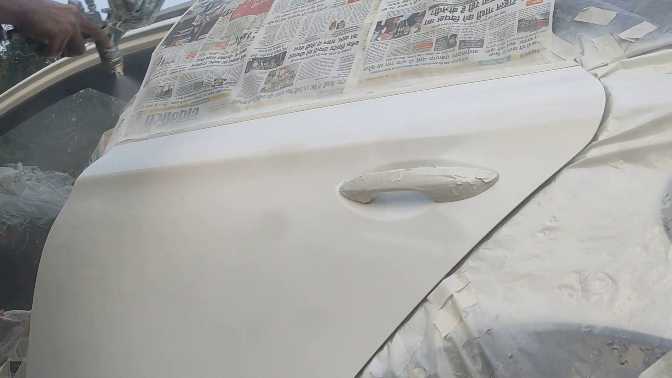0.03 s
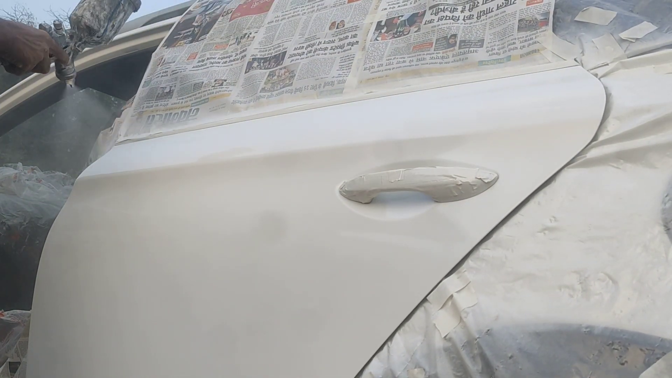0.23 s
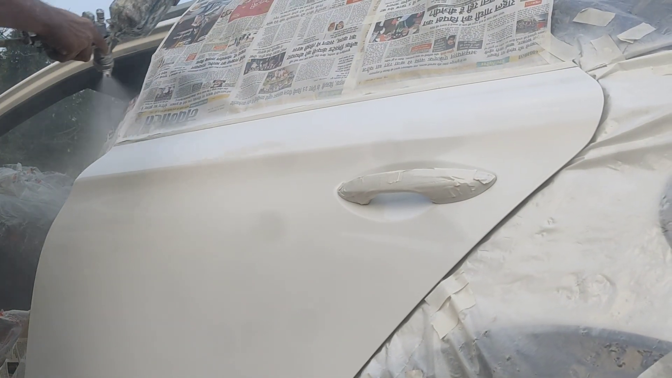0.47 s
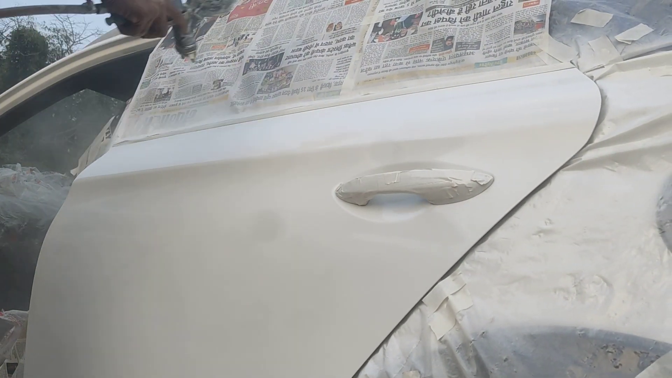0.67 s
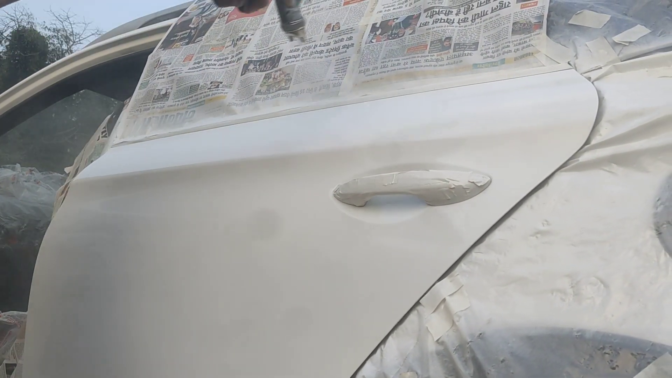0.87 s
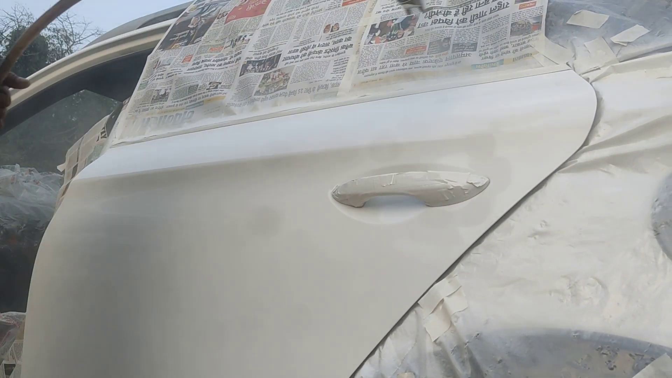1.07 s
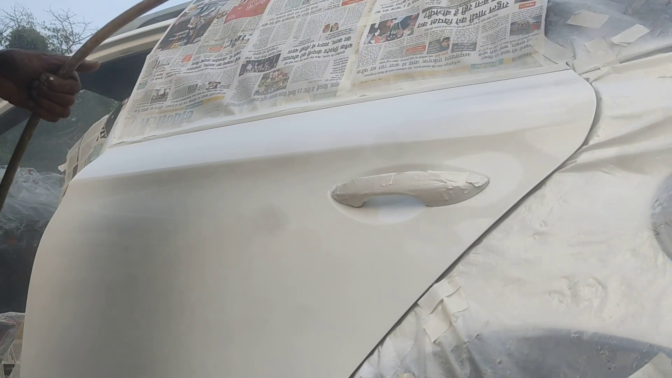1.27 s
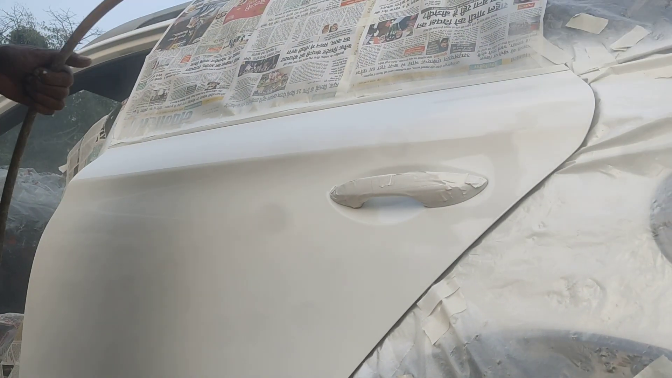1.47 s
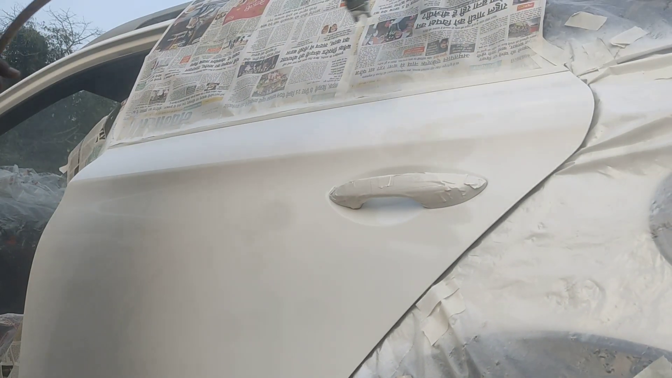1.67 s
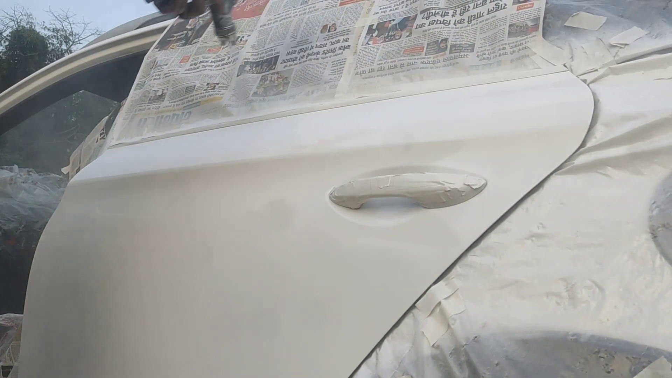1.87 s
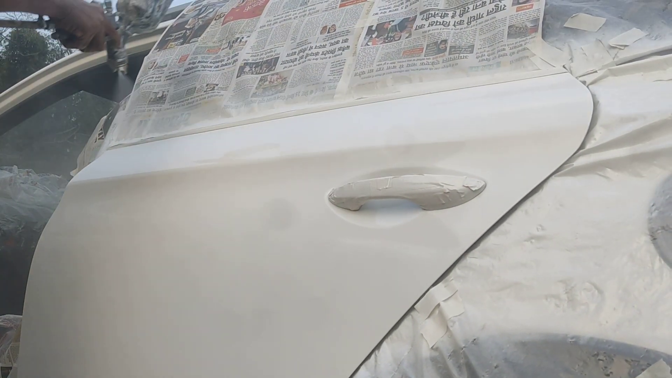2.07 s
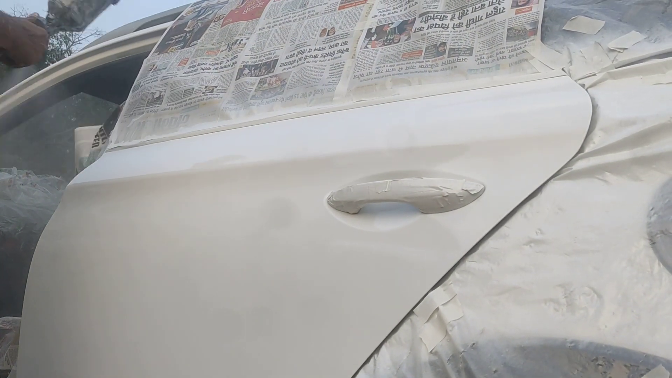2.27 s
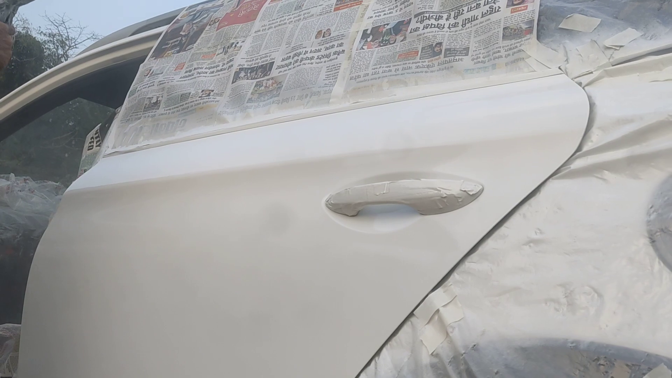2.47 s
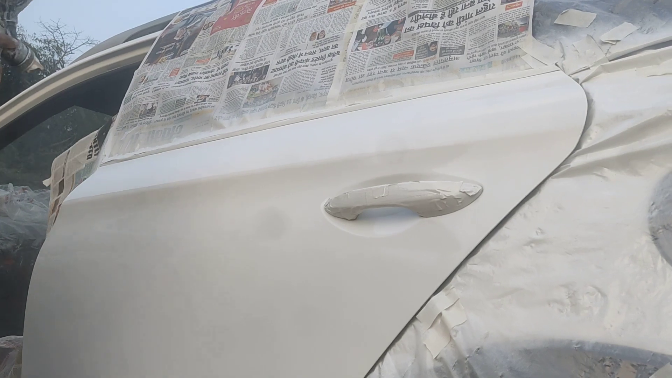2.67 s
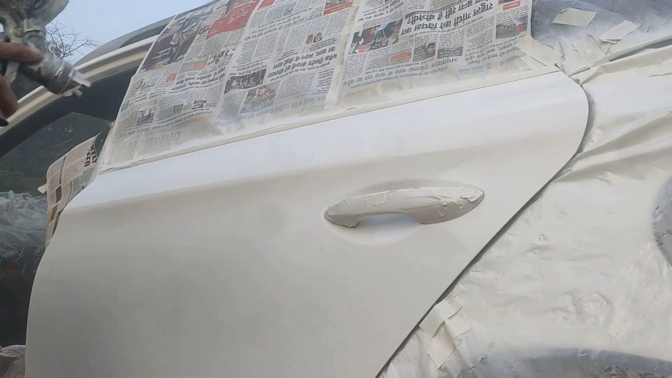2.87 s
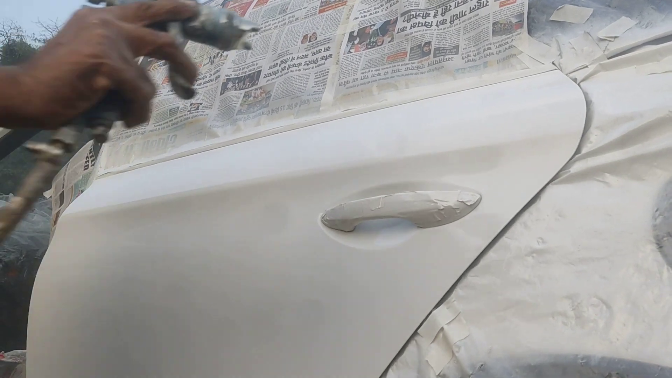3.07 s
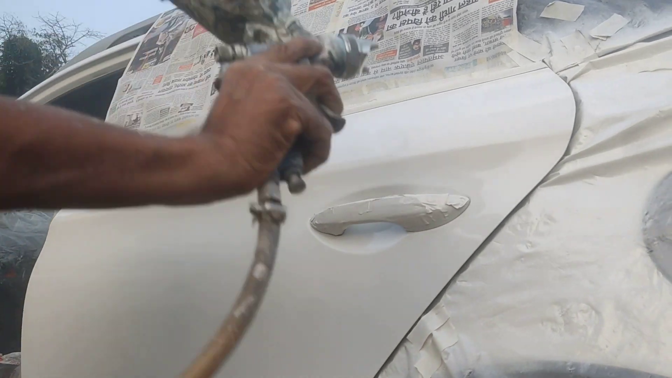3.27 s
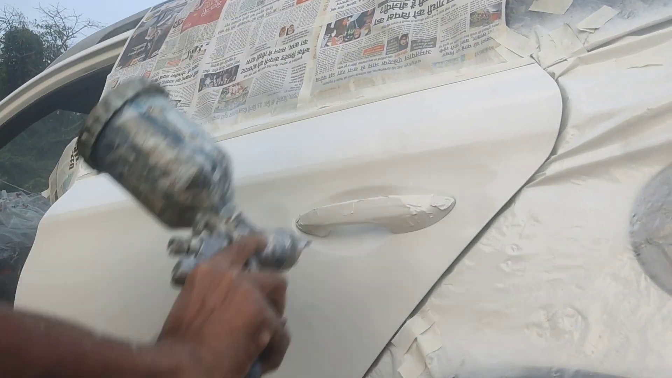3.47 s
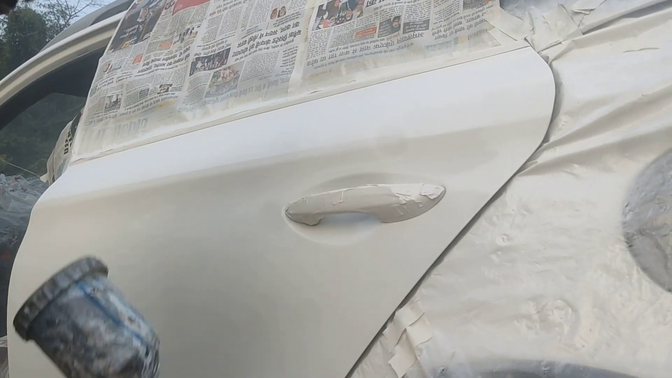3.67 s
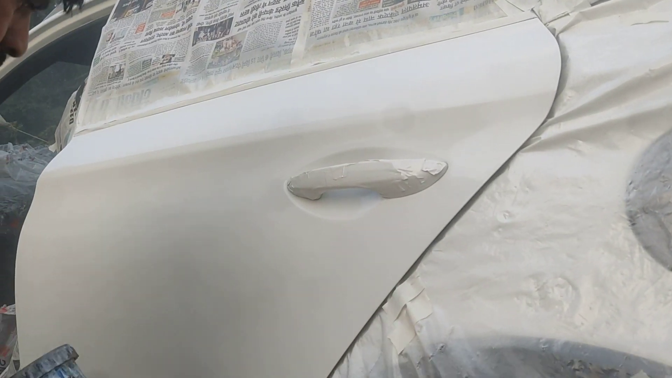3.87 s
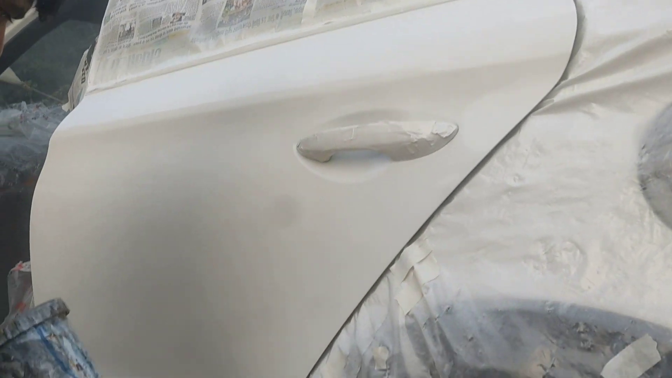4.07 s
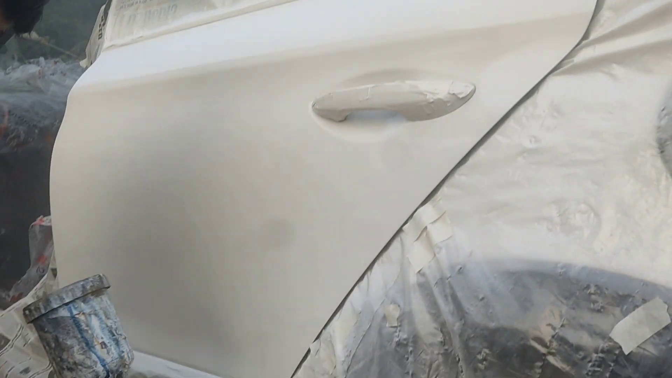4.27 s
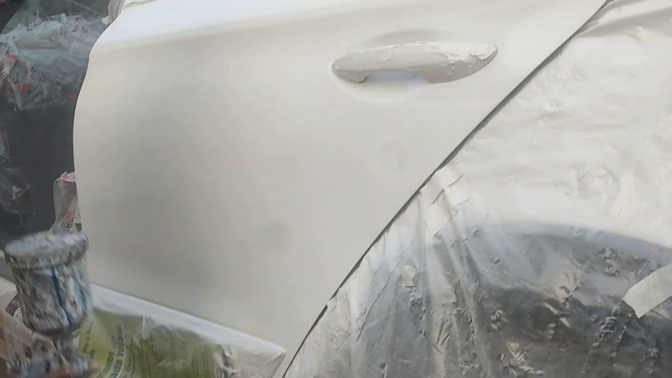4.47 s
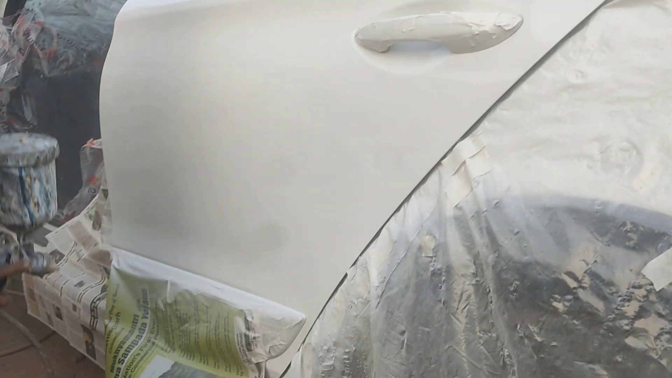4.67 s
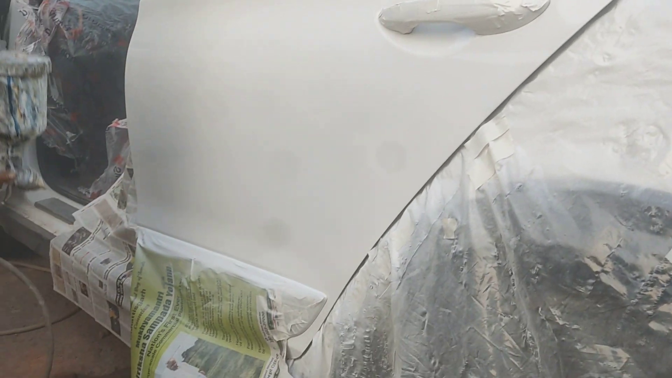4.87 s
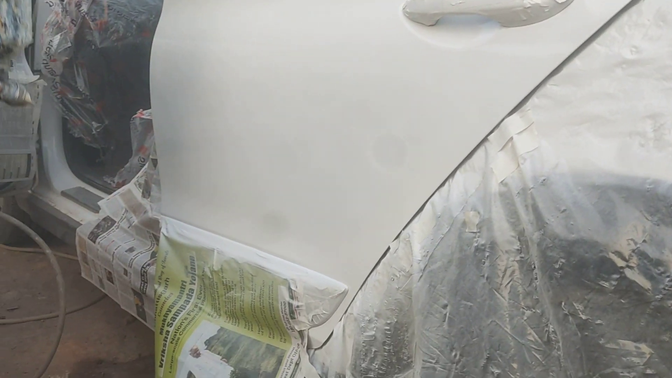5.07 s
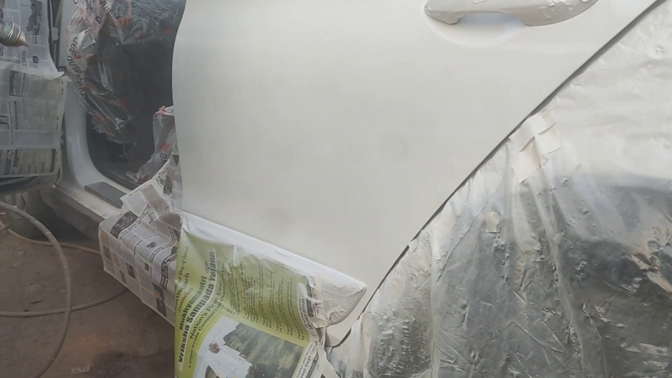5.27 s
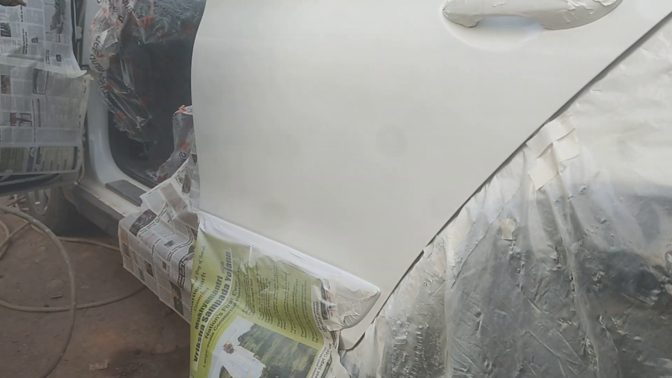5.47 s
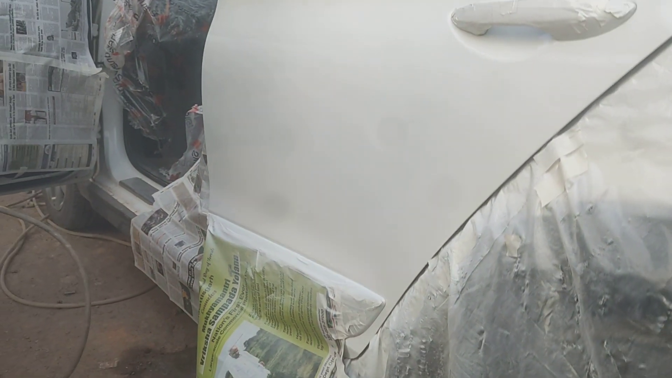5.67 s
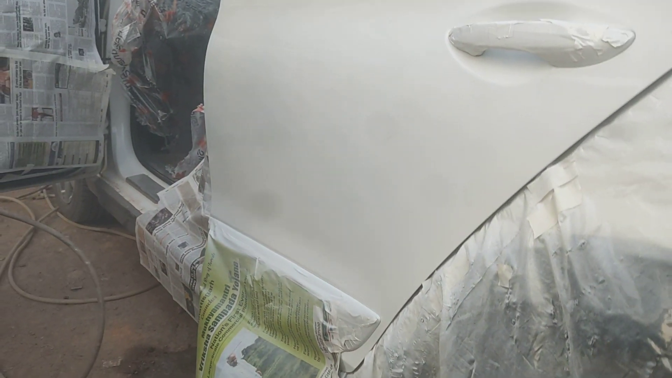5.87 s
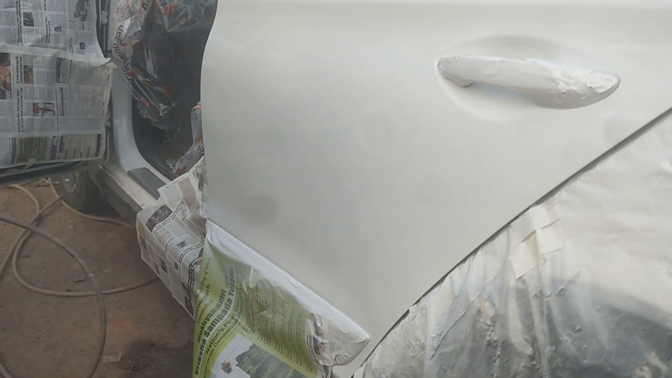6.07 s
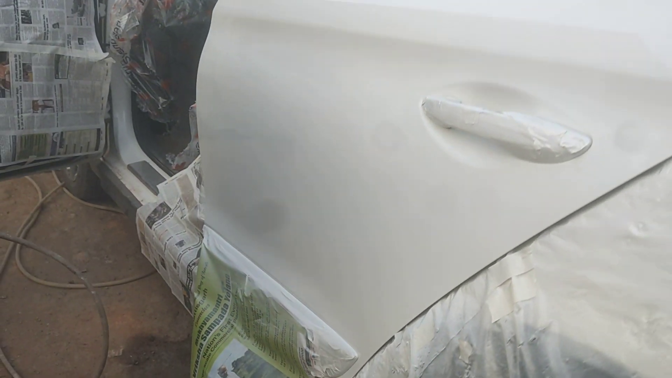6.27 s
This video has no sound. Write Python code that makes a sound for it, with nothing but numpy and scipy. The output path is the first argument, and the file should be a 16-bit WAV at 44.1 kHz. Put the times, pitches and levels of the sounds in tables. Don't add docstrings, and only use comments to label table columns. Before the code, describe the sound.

Outdoors beside a car door, an air spray gun hisses steadily and brightly for a little over two seconds. The trigger lets go and only a thin leak remains, until the nozzle swings past with a quick falling whoosh. A second, stronger spray follows, then weak uneven puffs fade away. A compressor hums steadily underneath. The sound sits almost wholly in the right channel; the left is muffled and nearly silent.

```python
import sys
import numpy as np
from scipy import signal
from scipy.io import wavfile
from scipy.ndimage import uniform_filter1d

SR = 44100
rng = np.random.default_rng(int(sys.argv[2]) if len(sys.argv) > 2 else 0)


def transcribe(signal):
    frames = np.atleast_2d(signal).T
    limited = np.clip(frames, -1, 1)
    pcm = np.round(limited * 32767).astype(np.int16)
    wavfile.write(sys.argv[1], SR, pcm)


def amplitude_ratio(level_db):
    exponent = np.asarray(level_db, float) / 20
    return 10 ** exponent


N = 279153
OPEN_DB = 5.5


def evened(x):
    return x / np.sqrt(np.mean(x ** 2) + 1e-20)


def smooth_random(size, passes):
    drift = rng.standard_normal(N)
    for _ in range(passes):
        drift = uniform_filter1d(drift, size=size)
    return evened(drift)


def read(points, hz):
    f, value = np.transpose(points)
    return np.interp(np.log(hz + 1), np.log(f + 1), value)


def curve(rows, t):
    s, *columns = np.transpose(rows)
    return [np.interp(t, s, c) for c in columns]


def grid(size):
    return np.arange(4 * N // size + 5) * size / 4 / SR, np.fft.rfftfreq(size, 1 / SR)[:, None]


def noise(field_db, size, patchy_db, flicker_db):
    t, hz = grid(size)
    a, b, patches = rng.standard_normal((len(t), len(hz), 3)).T
    patches = uniform_filter1d(patches, size=9, axis=0)
    patches = evened(uniform_filter1d(patches, size=17, axis=1))
    flicker = evened(uniform_filter1d(rng.standard_normal(len(t)), size=4))
    z = (a + 1j * b) * amplitude_ratio(field_db + patchy_db * patches + flicker_db * flicker)
    return evened(signal.istft(z, nperseg=size, noverlap=3 * size // 4)[1][:N])


# start_s, pitch_hz
ECHO_NOTCH = [(0, 4900), (.3, 4120), (.6, 4460), (.9, 4200), (1.5, 3960), (1.85, 4660), (2.15, 4350),
              (2.5, 3740), (3, 4960), (3.55, 4370), (4.3, 4270), (4.7, 4300), (4.95, 3840), (5.3, 4100),
              (6.33, 5200)]


def reflection_db(size):
    t, hz = grid(size)
    ratio = hz / curve(ECHO_NOTCH, t)[0]
    width = .08
    first_dip = np.exp(-((ratio - 1) / width) ** 2)
    third_dip = np.exp(-((ratio / 3 - 1) / width) ** 2)
    return -2.8 * first_dip - 1.5 * third_dip


# start_s, open_trigger_level_db, facing_microphone (0-1), striking_panel (0-1)
SPRAY_PASSES = [
    [(0, -28, 0.25, 0.57), (.3, -28, 0.4, 0.54), (.55, -25.5, 0.23, 0.59), (.76, -25, 0.5, 0.62),
     (.97, -27.5, 0.82, 0.73), (1.36, -28.5, 0.73, 0.68), (1.6, -27, 0.77, 0.74), (1.9, -26, 0.26, 0.65),
     (2.26, -27.5, 0.38, .2)],
    [(3.07, -23, 0.84, 0.16), (3.28, -22, 1, 0.12), (3.42, -22.5, 0.62, 0.44), (3.52, -24.5, 0.49, 0.85),
     (3.76, -24, 0.28, 0.67), (3.84, -23.5, 0.4, 0.18), (4.1, -20.5, 0.24, 0.15), (4.2, -22, 0.32, 0.18),
     (4.33, -23.5, 0.27, 0.3)],
]
LEAKING_RESTS = [
    [(2.3, -25.5, 0.39, 0.035), (2.47, -28.5, 0.65, .1), (2.61, -22, .2, 0.12), (2.68, -16.5, 0, 0),
     (2.76, -13, 0.25, 0), (2.88, -17, 0.23, 0.73), (2.98, -24.5, .3, 0.42)],
    [(4.4, -23.5, 0.23, 1), (4.55, -23, .3, 0.76), (4.81, -26.5, 0.57, 0.84), (5.1, -27.5, 0.35, 0.85),
     (5.3, -32, 0.32, 0.81), (5.75, -33.5, 0.18, 0.89), (6.08, -38, 0.098, 1), (6.33, -33.5, 0.06, .6)],
]
# pulled_s, let_go_s
TRIGGER_PULLS = [
    (-1, 2.262),
    (3.037, 4.337),
]
# peak_s, level_db, rise_s, fall_s
HOSE_SURGES = [(.05, 2.5, .04, .08), (.83, 0, 0.06, .1), (1.4, 1.5, 0.023, 0.075), (2.52, 5, .03, 0.067),
               (3.356, 4, 0.039, 0.071), (4.135, 1.5, 0.082, 0.041), (4.284, 2.5, .04, 0.049),
               (4.59, 7, 0.046, 0.063), (4.675, 9.5, 0.026, 0.048), (4.77, 8.5, .025, 0.034),
               (4.944, 10, 0.088, 0.071), (5.414, 6.5, 0.0087, 0.08), (5.52, 5, 0.037, 0.074),
               (5.87, 7.5, 0.11, 0.11), (6.2, 6.5, .1, 0.14)]


def aim(t):
    hand = SPRAY_PASSES[0] + LEAKING_RESTS[0] + SPRAY_PASSES[1] + LEAKING_RESTS[1]
    level_db, facing, striking = curve(hand, t)
    opens_s, shuts_s = .026, .023
    seep_db = -17.5
    pulled = 0
    for pulled_s, let_go_s in TRIGGER_PULLS:
        opening = (t - pulled_s) / opens_s
        shutting = 1 - (t - let_go_s) / shuts_s
        pulled = pulled + np.clip(np.minimum(opening, shutting), 0, 1)
    surge_db = 0
    for s, db, rise, fall in HOSE_SURGES:
        surge_db = surge_db + np.interp(t, [s - rise, s, s + fall], [0, db, 0])
    return level_db + seep_db * (1 - pulled) + surge_db, facing, striking, 1 - pulled, -surge_db


def layer_db(law, controls):
    return law[0] + np.dot(law[1:], controls)


# pitch_hz, level_db (per Hz)
OPEN_HISS = [(180, -63), (300, -23.5), (544, -29), (663, -24.5), (1110, -18.5), (1310, -18.5), (1700, -14),
             (2620, -16.5), (4300, -16), (6500, 2.5), (8050, -11), (9190, -14.5), (10700, -24),
             (12400, -21.5), (15600, -26)]
LAYER_BORDERS_HZ = [3200, 5200, 8200]
# aimed_away_db, facing_db, striking_db, released_db, surge_missed (share)
SPLASH_LAW = (-22, -0.5, 13, -1.5, .5)
SHOULDER_LAW = (-15.5, 6, 2, 3, 0.37)
FIZZ_LAW = (-11, 7, -2, -3.5, 0.3)
# start_s, pitch_hz, level_db (over the shoulder)
SWINGING_WHOOSH = [
    (2.72, 5430, -7),
    (2.8, 4550, 3),
    (2.91, 4230, 14.5),
    (2.97, 3650, 7),
    (3.02, 3060, 4),
    (3.04, 3100, -1.5),
]


def spray(controls):
    t, hz = grid(size=512)
    away_hz, facing_hz, centre_hz = 6950, 6230, 6500
    slide = (away_hz + (facing_hz - away_hz) * aim(t)[1]) / centre_hz
    above = [1 / (1 + (border / (hz + 1)) ** 24) for border in LAYER_BORDERS_HZ]
    shares = [1 - above[0], above[0] - above[1], above[1] - above[2], above[2]]
    share_db = [10 * np.log10(abs(s) + 1e-9) for s in shares]
    whoosh_hz, whoosh_db = curve(SWINGING_WHOOSH, t)
    aimed_db = reflection_db(size=512) + whoosh_db * np.exp(-((hz / whoosh_hz - 1) / 0.13) ** 2)
    hiss_db = read(OPEN_HISS, hz)
    splash = noise(hiss_db + share_db[0], size=512, patchy_db=1.5, flicker_db=0.06)
    shoulder = noise(hiss_db + aimed_db + share_db[1], size=512, patchy_db=0.2, flicker_db=0.86)
    jet = noise(read(OPEN_HISS, hz / slide) + share_db[2], size=512, patchy_db=0.55, flicker_db=0.5)
    fizz = noise(hiss_db + aimed_db + share_db[3], size=512, patchy_db=1.0, flicker_db=0.3)
    mix = jet + amplitude_ratio(layer_db(SPLASH_LAW, controls)) * splash
    mix += amplitude_ratio(layer_db(SHOULDER_LAW, controls)) * shoulder
    return mix + amplitude_ratio(layer_db(FIZZ_LAW, controls)) * fizz


# pitch_hz, level_db (per Hz)
MUFFLED_HISS = [(3500, -35), (5000, -15.5), (6000, -10.3), (7000, -3.5), (7900, 0.0), (8700, -0.9),
                (9300, -4.2), (10200, -11.9), (12000, -13.1), (14500, -14.4), (15600, -14.4)]
# aimed_away_db, facing_db, striking_db, released_db, surge_missed (share)
MUFFLED_LAW = (-30, 14.5, 3, -2, 0.5)


def muffled_hiss(controls):
    hiss = noise(read(MUFFLED_HISS, grid(size=512)[1]), size=512, patchy_db=1.3, flicker_db=.7)
    return amplitude_ratio(layer_db(MUFFLED_LAW, controls) - 10.0) * hiss


def gun():
    jet_db, *controls = aim(np.arange(N) / SR)
    both = np.array([muffled_hiss(controls), spray(controls)])
    sputter = smooth_random(300, passes=1)
    return amplitude_ratio(jet_db + OPEN_DB + 0.18 * sputter) * both


# multiple (of the crank rate), level_db
PUMP_TONES = [(3, -71.7), (4, -67.8), (5, -63.3), (6, -73.6), (7, -65.8), (8, -71.9), (10, -73.3),
              (11, -59.9), (12, -61.3), (14, -59.8), (15, -51.8), (16, -52.7), (18, -49.2), (19, -57.7),
              (20, -50.7), (21, -46.3), (22, -55.2), (23, -58.4), (24, -63.0), (25, -68.3), (27, -67.5),
              (41, -72.5), (42, -70.0), (43, -72.2), (44, -69.9), (51, -71.3), (53, -64.3), (54, -72.3),
              (55, -67.6), (56, -66.3)]
STROKE_PHASES = [.006, .911, .604]


def compressor():
    crank_hz, crank_start = 11.751, .272
    sweep = -.038
    sway = smooth_random(20000, passes=2)
    turns = crank_start + np.cumsum(crank_hz * (1 + 0.00004 * sway)) / SR
    drone = np.zeros(N)
    for multiple, db in PUMP_TONES:
        phase = STROKE_PHASES[int(multiple) % 3] - sweep * multiple ** 2
        drone += np.sqrt(2) * amplitude_ratio(db) * np.sin(2 * np.pi * (multiple * turns + phase))
    stroke = smooth_random(1500, passes=2)
    return drone * amplitude_ratio(0.16 * stroke)


# pitch_hz, level_db (per Hz)
YARD_AIR = [(13, -46), (22, -42), (124, -22), (233, -7.5), (334, -18), (562, -20.5), (645, -15.5),
            (1030, -22), (2340, -24.5), (3840, -24.5), (4290, -48), (6840, -11.5), (10100, -31.5),
            (14400, -32), (15600, -33.5)]


def yard():
    field_db = read(YARD_AIR, grid(size=2048)[1]) + reflection_db(size=2048)
    return amplitude_ratio(-41) * noise(field_db, size=2048, patchy_db=2.5, flicker_db=-0.07)


ENGINE_HZ = [40.6, 85.4]
ENGINE_WIDTH_HZ = [12.3, 5.7]
ENGINE_IDLE_DB = [-68, -81.5]
# centre_s, tone (1 or 2), level_db, length_s
ENGINE_SWELLS = [(1.133, 1, -67, .2), (2.413, 1, -64, 0.19), (2.792, 1, -64, .2), (3.08, 1, -61, 0.19),
                 (3.54, 1, -62, 0.18), (4.05, 1, -64, .2), (4.475, 1, -65, .2), (4.81, 1, -64, 0.16),
                 (5.43, 1, -70, .12), (5.66, 1, -57, 0.18), (2.7, 2, -64, .15), (3.026, 2, -64, .12),
                 (3.3, 2, -59.5, 0.34), (3.655, 2, -65, 0.35), (4.06, 2, -58.5, 0.14), (4.49, 2, -63.5, .2),
                 (4.764, 2, -60, 0.23), (5.13, 2, -59, 0.37), (5.598, 2, -59.5, 0.16),
                 (5.96, 2, -63.5, 0.18)]


def rumble():
    t, out = np.arange(N) / SR, np.zeros(N)
    for k, (idle_db, hz, width) in enumerate(zip(ENGINE_IDLE_DB, ENGINE_HZ, ENGINE_WIDTH_HZ)):
        gain = np.full(N, amplitude_ratio(idle_db))
        for s, tone, db, length in ENGINE_SWELLS:
            if round(tone) == k + 1:
                gain += amplitude_ratio(db) * np.exp(-(2 * (t - s) / length) ** 2)
        r = np.exp(-np.pi * width / SR)
        white = rng.standard_normal(N) + 1j * rng.standard_normal(N)
        wander = np.angle(signal.lfilter([1], [1, -2 * r, r * r], white))
        out += gain * amplitude_ratio(OPEN_DB) * np.sqrt(2) * np.sin(2 * np.pi * hz * t + wander)
    return out


def toot():
    t = np.arange(N) / SR
    centre_s, length_s, pitch_hz = 6.113, .09, 965
    swell = np.exp(-(2 * (t - centre_s) / length_s) ** 4)
    return amplitude_ratio(-53) * swell * np.sin(2 * np.pi * pitch_hz * t)


# pitch_hz, level_db (per Hz)
AMPLIFIER_NOISE = [(25, 0.0), (60, -5.9), (150, -6.1), (300, -6.6), (600, -12.0), (1200, -17.3),
                   (2500, -22.4), (4000, -27.3), (6000, -27.8), (8000, -24.2), (10000, -45)]


def amplifier():
    hz = grid(size=2048)[1]
    return amplitude_ratio(-63.5) * noise(read(AMPLIFIER_NOISE, hz), size=2048, patchy_db=.3, flicker_db=.2)


# pitch_hz, share_of_time (0-1)
PATCHES_MUTED = [(1000, 0), (1800, .05), (2600, .13), (4300, .27), (5400, .03), (8200, .04), (10300, .46),
                 (12300, .34), (15500, .3)]


def mute_patches(x, extra):
    top_hz, mask_octaves = 15600, .3
    hz, _, z = signal.stft(x, SR, nperseg=2048, noverlap=1536)
    local = uniform_filter1d(abs(z) ** 2, size=6, axis=0)
    local = uniform_filter1d(local, size=3, axis=1) + 1e-20
    octave = np.log2(hz + 500)
    reach = np.exp(-abs(octave[:, None] - octave) / mask_octaves * 3)
    under = np.log(local / (reach @ local))
    valleys = uniform_filter1d(uniform_filter1d(under, size=90, axis=0), size=15, axis=1)
    under -= .65 * valleys
    rank = under.argsort(axis=1).argsort(axis=1) / z.shape[1]
    share = read(PATCHES_MUTED, hz) + extra * np.clip(hz / 5000, 0, 1)
    kept = (rank >= share[:, None]) * (hz < top_hz)[:, None]
    return signal.istft(z * kept, nperseg=2048, noverlap=1536)[1][:N]


def scene():
    right = yard() + compressor() + rumble() + toot()
    return gun() + np.array([0 * right, right])


def low_pass(x):
    return signal.sosfilt(signal.butter(12, 16620, fs=SR, output="sos"), x)


def record(dry):
    left = mute_patches(dry[0] + amplifier(), extra=.24)
    right = mute_patches(dry[1], extra=0)
    return low_pass(np.array([left, right]))


dry = scene()
out = record(dry)
transcribe(out)
```